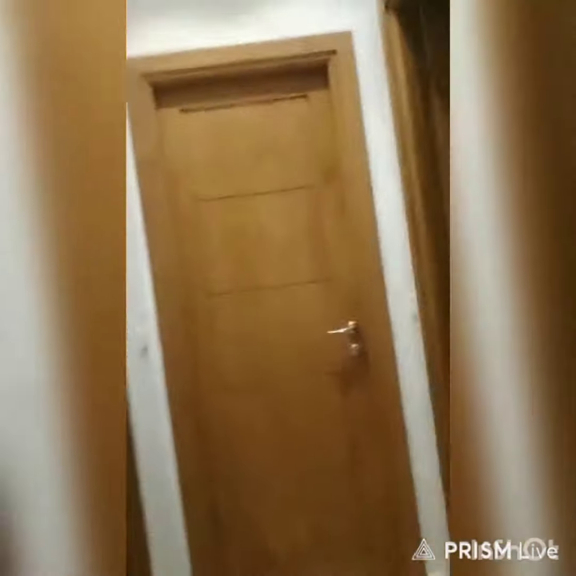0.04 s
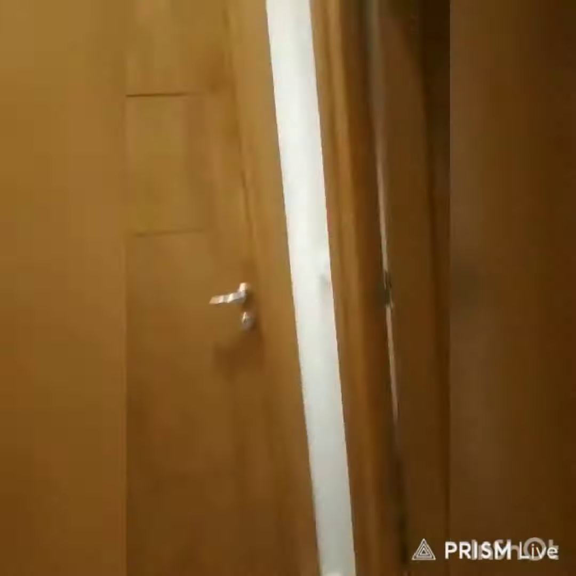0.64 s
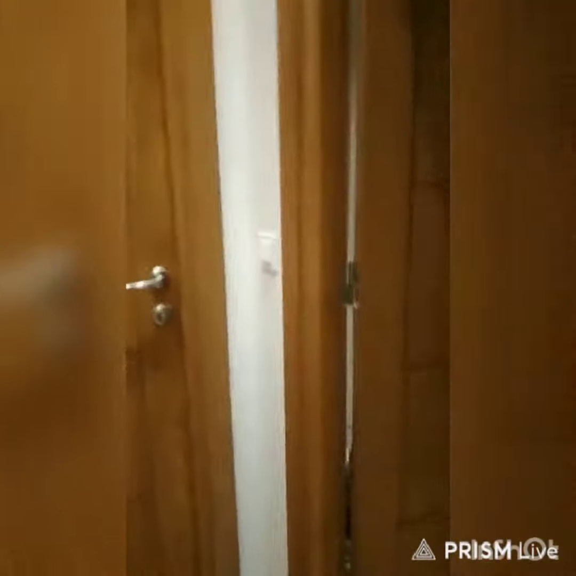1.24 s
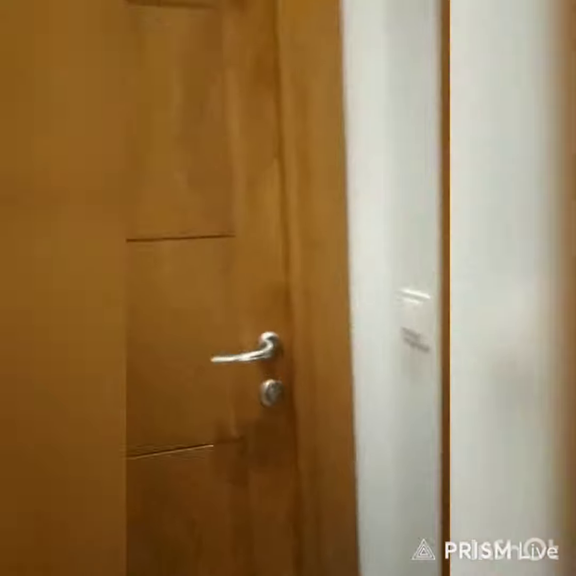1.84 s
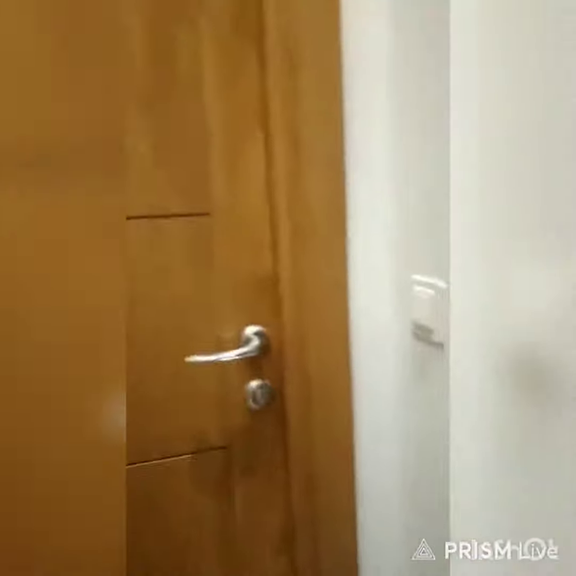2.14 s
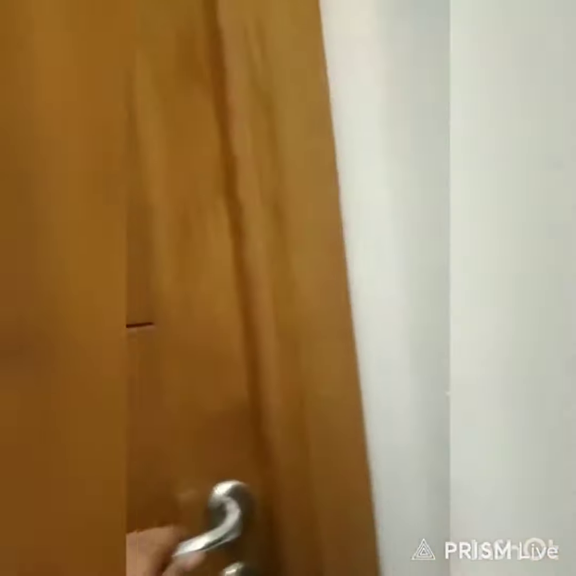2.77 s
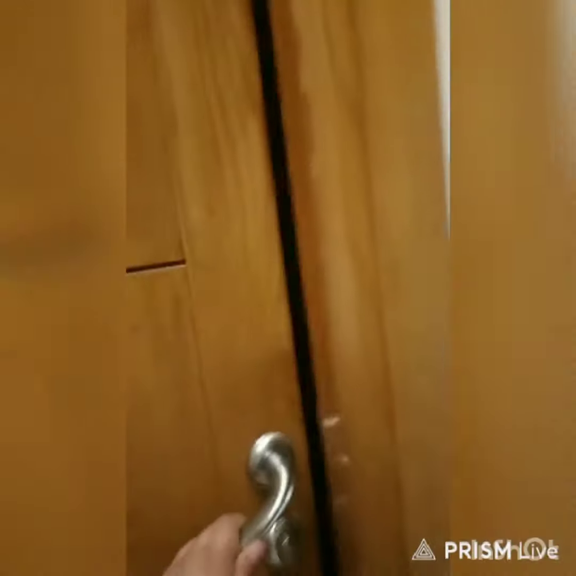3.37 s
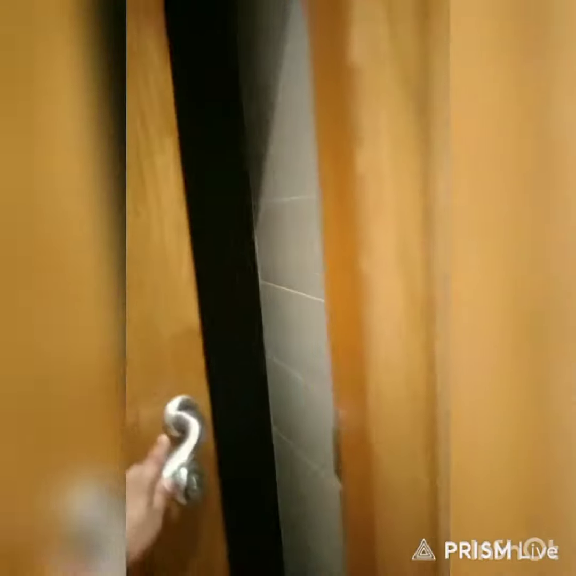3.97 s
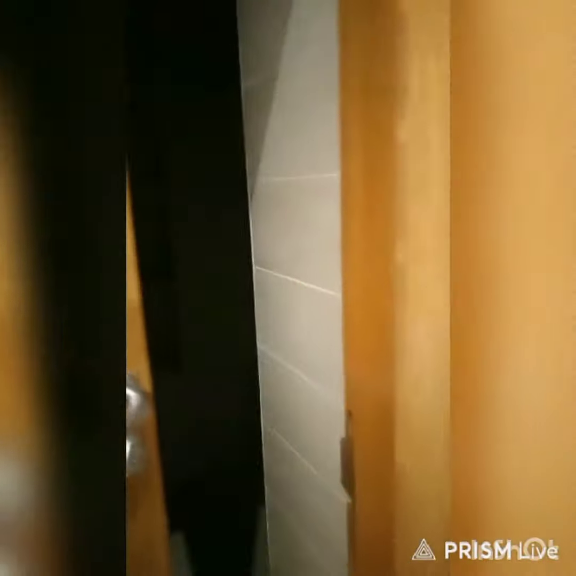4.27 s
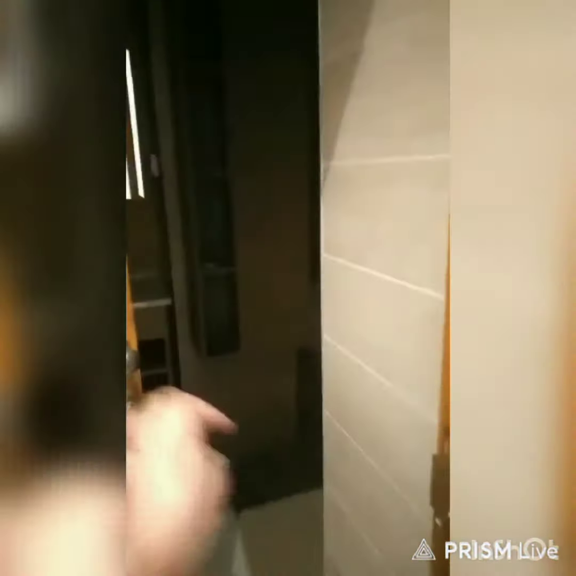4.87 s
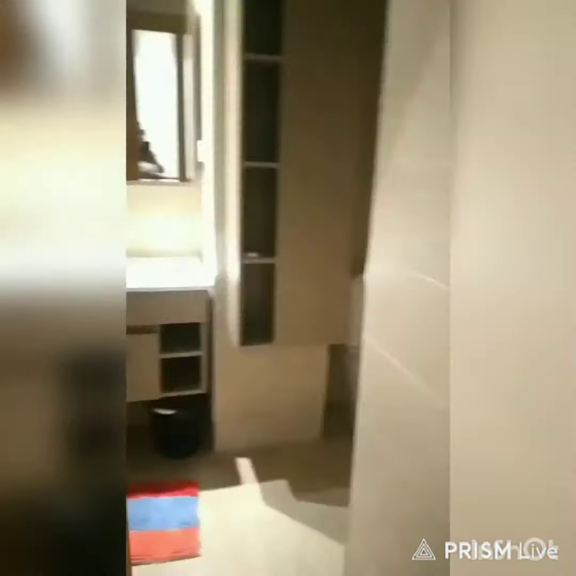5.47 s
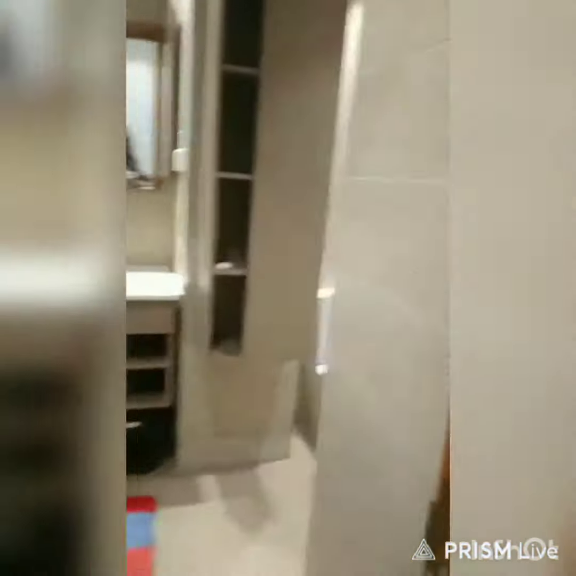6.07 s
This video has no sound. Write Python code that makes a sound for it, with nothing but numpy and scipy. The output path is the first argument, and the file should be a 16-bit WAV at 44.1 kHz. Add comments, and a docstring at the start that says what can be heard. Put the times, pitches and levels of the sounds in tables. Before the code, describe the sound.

Dull footfalls and the swish of clothing approach a wooden interior door. Its lever turns with a short squeak and a gritty scrape, then the latch releases in a quick cluster of knocks. Softer knocks and a faint rush of air follow as it opens. Last come two sharp, close clicks of a light switch, with a deep thump between them. The narrow hallway adds a short echo over a faint rumble.

```python
"""Hallway door and wall switch.

Someone walks up to a wooden door, clothes rustling, and presses its lever. The spindle scrapes, the
latch knocks and rings the leaf, and the door swings with a puff of air. A wall switch snaps twice
close by, with a heavy bump in between. A small hallway echoes; a noise gate mutes faint treble."""
import sys
import numpy as np
from scipy import signal
from scipy.fft import rfft, irfft, next_fast_len
from scipy.io import wavfile
from scipy.ndimage import uniform_filter1d

SR = 44100
rng = np.random.default_rng(int(sys.argv[2]) if len(sys.argv) > 2 else 0)


def file_out(sig):
    """Save sig as 16-bit WAV at sys.argv[1]."""
    # one column per channel
    cols = np.atleast_2d(sig).T
    # limit, then scale
    lim = np.clip(cols, -1, 1)
    pcm = np.round(lim * 32767).astype(np.int16)
    wavfile.write(sys.argv[1], SR, pcm)


N = 269892
TIME = np.arange(N) / SR
AGE = TIME[:SR // 2]   # seconds since the start of a short event


def amp(db):
    """Decibels to gain."""
    return 10 ** (np.asarray(db) / 20)


def unit_rms(x):
    """Scale to unit power."""
    return x / np.sqrt(np.mean(x ** 2) + 1e-20)


def at_hz(points, hz):
    """Read a table on a log-frequency axis."""
    points_hz, values = np.transpose(points)
    return np.interp(np.log(np.maximum(hz, 1)), np.log(points_hz), values)


def lowpass(x, hz, order=3):
    """Causal low-pass."""
    sos = signal.butter(order, min(hz, SR / 2 - 1000), fs=SR, output="sos")
    return signal.sosfilt(sos, x + 1e-18)


def highpass(x, hz, order=3):
    """Causal high-pass."""
    return signal.sosfilt(signal.butter(order, hz, "high", fs=SR, output="sos"), x + 1e-18)


def panned(x, left_db, lag_s):
    """Lean a sound to the left: louder there, later on the right."""
    delayed = np.interp(AGE - lag_s, AGE, x, left=0)
    return np.array([x * amp(left_db / 2), delayed * amp(-left_db / 2)])


def add(out, sound, start_s):
    """Mix a sound in at a time."""
    i = int(start_s * SR)
    out[:, i:i + sound.shape[-1]] += sound[..., :N - i]


def wander(hz, size=N):
    """Slow random motion of unit power."""
    return unit_rms(lowpass(rng.standard_normal(size), hz, order=2))


def grains(per_s, spread_db):
    """Slips at random moments and of uneven strength."""
    slipping = rng.random(N) < per_s / SR
    strength = amp(spread_db * np.minimum(rng.exponential(1, N), 3))
    return slipping * strength * rng.standard_normal((2, N))


# Each row: frequency in Hz, correlation of the two channels.
STEREO_CORRELATION = [(30, .985), (120, .98), (250, .93), (500, .68), (1000, -.02), (2000, -.08),
                      (4500, .05), (8000, .72)]


def coloured(white, spectrum):
    """Shape two noises by (Hz, dB) points into a stereo pair, alike in the bass."""
    size = white.shape[-1]
    padded = next_fast_len(size)
    hz = np.arange(padded // 2 + 1) * SR / padded
    mid, side = rfft(white, padded) * amp(at_hz(spectrum, hz)) * hz / np.hypot(hz, 20)
    alike = np.clip(at_hz(STEREO_CORRELATION, hz), -1, 1)
    pair = np.sqrt((1 + alike) / 2) * mid + np.sqrt((1 - alike) / 2) * side * [[1], [-1]]
    return irfft(pair, padded)[:, :size]


def noise(spectrum, size=len(AGE)):
    """Smooth stereo noise of unit power."""
    return unit_rms(coloured(rng.standard_normal((2, size)), spectrum))


def friction(spectrum, per_s):
    """Many tiny slips with a spectrum, unit power."""
    return unit_rms(coloured(grains(per_s, spread_db=1), spectrum))


def ringing(modes, uneven_db=1.5, pitch=1, age=AGE, alternate=True):
    """Struck modes, of alternating sign or all in step; each reaches one channel a little late."""
    out = np.zeros((2, len(age)))
    for k, (hz, db, t60) in enumerate(modes):
        alike = np.clip(at_hz(STEREO_CORRELATION, hz), -1, 1)
        lag_rad = np.arccos(alike) * rng.permutation(2)[:, None]
        wave = np.sin(np.maximum(2 * np.pi * hz * pitch * age - lag_rad, 0))
        decay = amp(db + uneven_db * rng.normal() - 60 * age / t60)
        out += (-1) ** (k * alternate) * decay * wave
    return out


# Each row: frequency in Hz, relative noise density in dB.
AIR_SPECTRUM = [(20, 1), (45, -2), (65, -1), (100, -15), (140, -12), (250, -20.5), (400, -20), (700, -28.5),
                (1500, -33), (2600, -44.5), (3500, -54), (11000, -57)]


def still_air(level_db=-48):
    """The air of the room rumbles faintly and steadily."""
    return amp(level_db) * noise(AIR_SPECTRUM, size=N)


# Each row: frequency in Hz, echo t60 in seconds.
ECHO_DECAY = [(125, .75), (500, .75), (2000, .68), (8000, .6)]
# Each row: frequency in Hz, echo gain in dB.
ECHO_SPECTRUM = [(40, -6), (200, -4), (500, -6), (1000, -3), (2200, -2), (5000, -1), (10000, 0)]


def hallway(x, build_s=0.0024):
    """Close walls return dense echoes that build quickly and die sooner in the treble."""
    age = TIME[:SR]
    rest = coloured(rng.standard_normal((2, SR)), ECHO_SPECTRUM)
    response = np.zeros((2, SR))
    for top_hz in (250, 1000, 4000, 16000):
        band = signal.sosfiltfilt(signal.butter(3, top_hz, fs=SR, output="sos"), rest)
        rest = rest - band
        response += band * amp(-60 * age / at_hz(ECHO_DECAY, top_hz / 2))
    response *= (1 - np.exp(-(age / build_s) ** 2)) * np.sqrt(20 / SR)
    return signal.oaconvolve(x[:1], response, axes=1)[:, :N]


def draught(peak_s=3.84, width_s=0.56, level_db=-44, cutoff_hz=41):
    """Air from the swinging door swells and rumbles on the right microphone port alone."""
    gust = amp(level_db) * np.exp(-((TIME - peak_s) / width_s) ** 2)
    rumble = unit_rms(highpass(wander(cutoff_hz), 6.9, order=2))
    return gust * rumble * [[0], [1]]


# Each row: start in seconds, level in dB, strongest push in Hz, swell in seconds.
WEIGHT_SHIFTS = [(0.355, -24, 33.4, 0.033), (1.499, -44.5, 44, 0.03), (2.801, -25.5, 47.7, 0.082),
                 (3.05, -27.5, 48, 0.0063), (3.213, -31, 65, 0.086), (3.963, -40, 62, 0.033),
                 (5.404, -34.5, 54, 0.018), (5.487, -26, 60, 0.0092), (5.556, -16, 69.2, 0.068)]
# Each row: frequency in Hz, level in dB, t60 in seconds.
DEEP_MODES = [(30.63, -3, 2.55), (41.93, 0, 1.12), (48, -7.5, 0.17), (60, -20.5, 0.15), (65.87, -2, 0.69),
              (75.4, -8.5, 0.38)]


def booms(width_octaves=0.45):
    """Each shift of weight swells the deep modes of floor, door and room air near its own pace."""
    out, age = np.zeros((2, N)), TIME[:2 * SR]
    for start_s, db, push_hz, swell_s in WEIGHT_SHIFTS:
        modes = [(hz, mode_db - 6 * (np.log2(hz / push_hz) / width_octaves) ** 2, t60)
                 for hz, mode_db, t60 in DEEP_MODES]
        swell = 1 - np.exp(-age / swell_s)
        add(out, amp(db) * swell * ringing(modes, uneven_db=2.0, age=age), start_s)
    return out


# Each row: start in seconds, level in dB, swell in seconds, t60 in seconds, brushing share in dB.
CLOTH_MOVES = [(0.0, -65, 0.0028, 2.8, -12), (.3, -70.5, 0.12, 7.7, -17.5),
               (0.65, -60.5, 0.068, 0.13, -9.5), (1.103, -62, 0.019, 0.12, -1.5),
               (1.385, -58.5, 0.049, 0.58, -10), (1.64, -58.5, 0.022, 0.36, -2),
               (2.011, -60.5, 0.0022, 0.25, -8.5), (2.19, -61.5, 0.053, 0.61, -4),
               (2.53, -65.5, 0.057, 2.7, -13), (3.533, -54.5, 0.015, 0.36, -19), (3.74, -54, 0.083, 2, -14),
               (3.87, -62.5, 0.097, 0.29, 7), (4.081, -57, 0.21, 1.4, -17.5),
               (5.234, -67.5, 0.005, 0.49, 7.5)]
# Each row: frequency in Hz, relative noise density in dB.
CLOTH_SPECTRUM = [(200, -16.5), (500, 0), (1000, 2), (1600, 6.5), (2300, 3.5), (2650, -4), (3300, -13),
                  (4500, -17), (7000, -22), (11000, -31.5)]


def clothes():
    """Fibres slide with each stride or reach, each move with its own share of brighter brushing."""
    slide_gain, brush_gain = np.zeros((2, 1, N))
    age = TIME[:2 * SR]
    for start_s, db, swell_s, t60, brush_db in CLOTH_MOVES:
        motion = np.minimum(age / swell_s, 1) * amp(db - 60 * np.maximum(age - swell_s, 0) / t60)
        add(slide_gain, motion, start_s)
        add(brush_gain, amp(brush_db) * motion, start_s)
    brush_hz_db = [(200, -16), (800, 14), (1800, -6), (2700, -13), (3800, -2), (7000, -14),
                   (11000, -40.5)]
    folds = amp(1.3 * wander(hz=25))
    sliding = slide_gain * friction(CLOTH_SPECTRUM, per_s=3000)
    brushing = brush_gain * friction(brush_hz_db, per_s=3000)
    return folds * (sliding + brushing)


# Each row: start in seconds, level in dB.
METAL_TICKS = [(1.1102, -55.5), (1.115, -47.5), (4.49, -64.5)]
# Each row: frequency in Hz, level in dB, t60 in seconds.
TRINKET_MODES = [(1960, 5, 0.02), (2215, -2, .035), (2473, -1.5, 0.027), (3430, -10, 0.049),
                 (4420, -19, .09), (5070, -15, 0.062), (6460, -20, .1), (6837, -19, .09), (7354, -24, .1)]


def ticks(tap_t60_s=0.032, tap_db=-4, ring_db=-3):
    """A small metal part, like a zip or buckle, taps and rings briefly."""
    out = np.zeros((2, N))
    tap_hz_db = [(300, -11), (1000, 4), (2400, 0), (3500, -2), (6500, -15), (11000, -40)]
    for start_s, db in METAL_TICKS:
        tap = amp(tap_db - 60 * AGE / tap_t60_s) * noise(tap_hz_db)
        add(out, amp(db) * (tap + amp(ring_db) * ringing(TRINKET_MODES)), start_s)
    return out


# Each row: start in seconds, level in dB, length in seconds, first and last pitch in Hz.
SQUEAK_GLIDES = [(1.39, -57, 0.035, 1470, 1463), (1.653, -54.5, 0.036, 1606, 1645),
                 (2.754, -55, 0.061, 1180, 1306), (2.813, -44, 0.049, 1233, 1677)]


def squeaks(jitter=0.088):
    """Soles and lever spring stick and slip in short, unsteady, gliding tones."""
    out = np.zeros((2, N))
    for start_s, db, length_s, first_hz, last_hz in SQUEAK_GLIDES:
        along = np.clip(AGE / length_s, 0, 1)
        waver = unit_rms(uniform_filter1d(rng.standard_normal(len(AGE)), size=60))
        hz = (first_hz + (last_hz - first_hz) * along) * (1 + jitter * waver)
        tone = np.sin(2 * np.pi * np.cumsum(hz) / SR)
        grip = unit_rms(amp(3 * wander(hz=200, size=len(AGE))))
        add(out, amp(db) * grip * np.sin(np.pi * along) * tone, start_s)
    return out


# Each row: start in seconds, level in dB, contact cutoff in Hz, t60 in seconds, knock share in dB.
SOFT_BLOWS = [(.299, -41, 1097, 0.19, 5), (.311, -37, 594, 0.24, 2), (0.371, -42, 1130, 0.27, 3),
              (.386, -36, 524, 0.31, 2.5), (.423, -39, 432, 0.31, -3), (1.114, -51, 243, 0.36, -10),
              (2.012, -54, 2540, 0.038, 8), (2.88, -36, 295, 0.76, -17), (3.20, -36, 222, 0.6, -17.5),
              (3.931, -37, 520, 0.41, 5.5), (3.979, -38, 186, 0.23, 10), (4.279, -50.5, 845, 0.36, -12),
              (5.400, -26, 373, 0.19, -20), (5.409, -31, 940, 0.17, 1), (5.44, -34.5, 750, 0.68, -3),
              (5.486, -30.5, 950, 0.11, 1.5), (5.553, -28.5, 610, 0.39, -13)]
# Each row: frequency in Hz, level in dB, t60 in seconds.
FLOOR_MODES = [(53.3, -3.5, 0.052), (148, -6.5, 0.14), (280, -12.5, 0.036), (345, -3, 0.07),
               (515, -4, 0.029), (617, -8.5, 0.046), (920, -5, 0.0079)]


def thuds(rise_s=0.0028):
    """Weight lands with a firm knock and shakes the crowded low modes of floor and door."""
    out = np.zeros((2, N))
    body_hz_db = [(30, 7.5), (70, 3.5), (125, 2.5), (190, -1), (260, -5.5), (360, -2.5), (550, -7),
                  (800, -10.5), (2500, -4.5), (6000, -39.5)]
    for start_s, db, cutoff_hz, t60, knock_db in SOFT_BLOWS:
        envelope = amp(-60 * AGE / t60) * (1 - np.exp(-AGE / rise_s))
        shudder = envelope * unit_rms(lowpass(noise(body_hz_db), cutoff_hz, order=4))
        knock = lowpass(ringing(FLOOR_MODES), cutoff_hz)
        add(out, amp(db) * (shudder + amp(knock_db) * knock), start_s)
    return out


# Each row: centre in seconds, half-width in seconds, boost in dB.
SPINDLE_CATCHES = [(2.783, 0.03, 1.5), (2.834, 0.027, 6), (2.944, 0.044, 2.5), (3.009, .016, 10)]
# Each row: frequency in Hz, level in dB, t60 in seconds.
SPRING_MODES = [(1328, 4.5, 0.025), (1537, -4, 0.037), (1730, -2, 0.038), (1984, -3, 0.048),
                (2300, -7, 0.049), (2620, -6, 0.05), (2885, -10.5, .07), (3310, -15, 0.029),
                (3600, -14, .06), (3990, -17, 0.063), (4280, -15, .04), (4790, -21, 0.06), (5970, -23, .05),
                (6580, -21.5, 0.06), (6570, -22, .05), (6900, -25, 0.05), (7660, -27.5, .04),
                (9560, -28, .03)]


def lever(start_s=2.66, swell_s=0.061, end_s=3.115, stop_s=0.012,
          level_db=-49.5, scrape_db=-4, ring_db=-3, tighten_per_s=0.1, waver=0.01):
    """The spindle scrapes in surges; its grit plucks the spring, whose ring rises as it is wound."""
    swell = np.sin(np.pi / 2 * np.clip((TIME - start_s) / swell_s, 0, 1)) ** 2
    stop = np.clip(1 - (TIME - end_s) / stop_s, 0, 1)
    catch_db = sum(db * np.exp(-((TIME - centre_s) / width_s) ** 2)
                   for centre_s, width_s, db in SPINDLE_CATCHES)
    effort = swell * stop * amp(level_db + catch_db)
    scrape_hz_db = [(200, 2.5), (400, 7.5), (750, 2.5), (1400, 3.5), (2600, -2), (3400, -12),
                    (5400, -13.5), (6500, -14.5), (8000, -19.5), (10000, -33.5), (13000, -54)]
    grit = grains(per_s=2200, spread_db=1.2)
    scrape = friction(scrape_hz_db, per_s=2800)
    ring = unit_rms(signal.oaconvolve(grit, ringing(SPRING_MODES), axes=1)[:, :N])
    from_midturn_s = np.clip(TIME, start_s, end_s) - (start_s + end_s) / 2
    pitch = 1 + tighten_per_s * from_midturn_s + waver * wander(hz=30)
    ring = np.array([np.interp(np.cumsum(pitch) / SR, TIME, side) for side in ring])
    surges = amp(1.8 * wander(hz=30))
    return effort * surges * (amp(scrape_db) * scrape + amp(ring_db) * ring)


# Each row: start in seconds, level in dB, contact cutoff in Hz, leaf share in dB, bolt share in dB,
# bolt pitch ratio.
LATCH_KNOCKS = [(2.823, -45, 10000, -7, -7, 1.0), (2.979, -35, 9000, -17, 10.5, 1),
                (2.9816, -24, 3550, 5, 3.5, 0.81), (2.994, -28, 2300, -19, -11, 1.1),
                (3.000, -29, 1900, -10, -10, 0.88), (3.0146, -24.5, 3770, -13, -3, 0.77),
                (3.022, -20.5, 1900, -7.5, -18, 1.1), (3.028, -29, 2400, -10.5, -12, .8),
                (3.056, -34.5, 2600, -8, -8, .9), (3.551, -36, 2920, -12, -16, 0.8),
                (3.929, -35, 1360, -9, -23, .9), (4.624, -43, 2030, -12, -20, 0.98)]
# Wooden leaf, steel lock case, sprung bolt. Each row: frequency in Hz, level in dB, t60 in seconds.
LEAF_MODES = [(129.8, -14.5, 0.64), (181, -14, 0.66), (204.5, -1, 0.11), (240.1, -12.5, 0.36),
              (314.7, -14.5, 0.21), (372, -11, 0.12), (429.2, -12, 0.25), (458, -7.5, 0.081),
              (496, -14.5, 0.21), (556, -23, 0.32)]
LOCK_MODES = [(868, -7, 0.027), (1040, -5, 0.024), (1180, -7, 0.014), (1307, -17, 0.03),
              (1230, -11.5, 0.051), (1520, -11, 0.03), (1696, -17.5, 0.067), (1796, -15, 0.031),
              (2124, -15.5, 0.12), (2530, -18, 0.02), (2510, -8, 0.0088)]
BOLT_MODES = [(2820, -0.5, 0.0042), (3660, -18, 0.011), (3920, -17, .008), (6600, -18, 0.0039),
              (7900, -26, 0.006)]
# Each row: frequency in Hz, relative noise density in dB.
RATTLE_SPECTRUM = [(150, -40), (450, -2.5), (650, -7.5), (900, -5), (1400, -3.5), (2000, -4.5), (2700, -5),
                   (3500, -36), (6500, -14.5), (10000, -26), (13000, -28)]


def latch(rattle_db=-7, rattle_t60_s=0.05, lock_db=-3, leaf_build_s=0.002):
    """Each blow of latch or lever rings lock and bolt, shakes loose parts and carries into the leaf."""
    out = np.zeros((2, N))
    leaf_build = 1 - np.exp(-AGE / leaf_build_s)
    for start_s, db, cutoff_hz, leaf_db, bolt_db, bolt_pitch in LATCH_KNOCKS:
        lock = amp(lock_db) * ringing(LOCK_MODES)
        bolt = amp(bolt_db) * ringing(BOLT_MODES, pitch=bolt_pitch)
        rattle = amp(rattle_db - 60 * AGE / rattle_t60_s) * noise(RATTLE_SPECTRUM)
        leaf = amp(leaf_db) * leaf_build * ringing(LEAF_MODES, alternate=False)
        add(out, amp(db) * lowpass(lock + bolt + rattle + leaf, cutoff_hz), start_s)
    return out


# Two touches, then two throws. Each row: start in seconds, level in dB, snap share in dB, crack share
# in dB, seating delay in seconds, pitch ratio, contact cutoff in Hz, box t60 ratio.
ROCKER_CLICKS = [(5.234, -46, -6, -19, 0.0011, 0.99, 7000, 3.3),
                 (5.271, -37, 7, -2.5, 0.0004, 0.88, 3820, 1.25),
                 (5.292, -8.5, -8, -26.5, 0.00048, 0.97, 14000, 1.07),
                 (5.525, -12.5, -7.5, -18.5, 0.0011, 0.96, 6450, 1.62)]
# Wall box and plastic plate. Each row: frequency in Hz, level in dB, t60 in seconds.
BOX_MODES = [(505.6, 1.5, 0.035), (918, -10.5, 0.017), (1307, -14.5, 0.043)]
PLATE_MODES = [(1430, -6.5, 0.021), (1595, -20, 0.022), (1680, -9.5, 0.012), (2000, -16, 0.0098),
               (2350, -13, 0.022), (2563, -17.5, 0.029), (3840, -26.5, 0.0084), (4020, -16.5, 0.0055),
               (5660, -26.5, 0.012), (6460, -25, 0.015), (9950, -46, 0.018)]


def switch(crack_t60_s=0.068, box_build_s=0.0018, lowest_hz=340):
    """The rocker snaps over in its plate, then seats and rings the hollow box, damped by the finger."""
    out = np.zeros((2, N))
    crack_hz_db = [(400, -4.5), (700, 17.5), (1500, 12.5), (2900, -4.5), (3800, -8), (4800, -8),
                   (6300, -8), (10000, -6.5), (14000, -26)]
    for start_s, db, snap_db, crack_db, seat_s, pitch, cutoff_hz, t60_ratio in ROCKER_CLICKS:
        crack = amp(crack_db - 60 * AGE / crack_t60_s) * noise(crack_hz_db)
        snap = amp(snap_db) * ringing(PLATE_MODES, pitch=pitch)
        add(out, amp(db) * lowpass(snap + crack, cutoff_hz), start_s)
        note = sum(amp(mode_db - 60 * AGE / (t60 * t60_ratio)) * np.sin(2 * np.pi * hz * pitch * AGE)
                   for hz, mode_db, t60 in BOX_MODES)
        note *= 1 - np.exp(-AGE / box_build_s)
        add(out, amp(db) * panned(note, left_db=3.5, lag_s=0.0001), start_s + seat_s)
    return highpass(out, lowest_hz, order=4)   # the clicks carry nothing below about 340 Hz


def scene():
    """All sources in the hallway, over its still air."""
    floor, door = thuds(), latch()
    handle = lever() + squeaks()
    cloth = clothes() + ticks()
    clicks = switch()
    # the bright snap spreads through the room, the hollow note stays near the wall
    click_send = amp(-9) * clicks + amp(-3) * highpass(clicks, 1500, order=1)
    echoes = hallway(floor + amp(-1.5) * door + amp(-6.5) * handle + amp(-0.5) * cloth + click_send)
    return still_air() + booms() + draught() + echoes + floor + cloth + handle + door + clicks


# Each row: frequency in Hz, gain of both ports in dB.
PORT_TREBLE = [(10900, 0), (11900, -18), (15000, -30)]
# Each row: frequency in Hz, left minus right in dB.
PORT_BALANCE = [(120, 0.15), (250, 0), (500, 2.5), (1000, 1.2), (2000, 1.1), (4500, 2), (7000, 3.5),
                (10000, -4)]


def ports(x):
    """The microphone ports dull the very top, and each colours its channel a little differently."""
    size = next_fast_len(N)
    hz = np.arange(size // 2 + 1) * SR / size
    gain_db = at_hz(PORT_TREBLE, hz) + at_hz(PORT_BALANCE, hz) * [[1], [-1]] / 2
    return irfft(rfft(x, size) * amp(gain_db), size)[:, :N]


def treble_gate(x, split_hz=2850, open_db=-63.5, knee_db=5, depth_db=15):
    """A noise suppressor turns the treble down whenever there has been little of it."""
    low = signal.sosfiltfilt(signal.butter(12, split_hz, fs=SR, output="sos"), x)
    treble = x - low
    power = uniform_filter1d(np.mean(treble ** 2, axis=0), size=1600, origin=520)
    level_db = 10 * np.log10(np.abs(power) + 1e-14)
    closed = np.clip((open_db - level_db) / knee_db, 0, 1)
    return low + treble * amp(-depth_db * closed)


def record(dry, hiss_db=-91, cutoff_hz=15500):
    """Two ports pick the sound up, faint treble is muted, the electronics hiss and the top is cut."""
    hiss = amp(hiss_db) * rng.standard_normal((2, N))
    top_cut = signal.ellip(7, 0.3, 50, cutoff_hz, fs=SR, output="sos")
    return signal.sosfilt(top_cut, treble_gate(ports(dry)) + hiss)


dry = scene()
out = record(dry)
file_out(out)
```